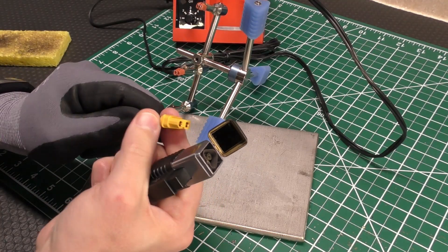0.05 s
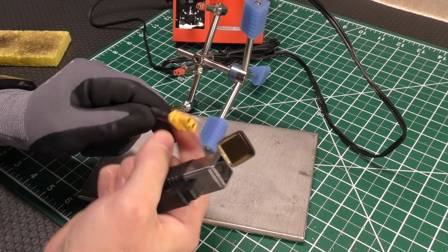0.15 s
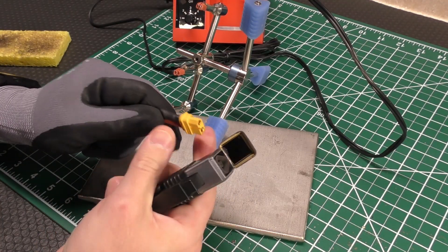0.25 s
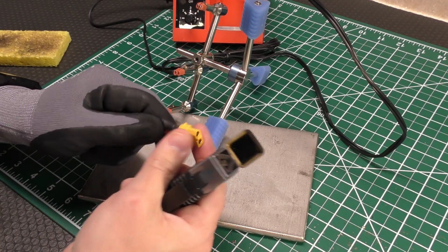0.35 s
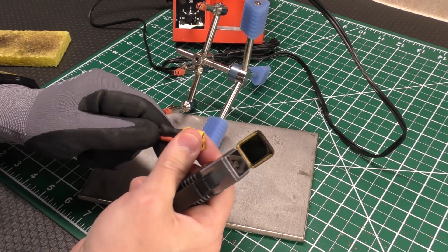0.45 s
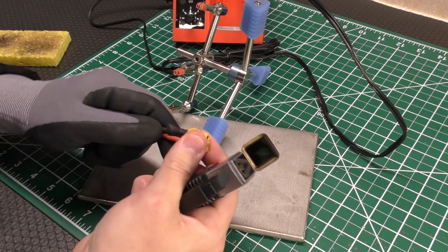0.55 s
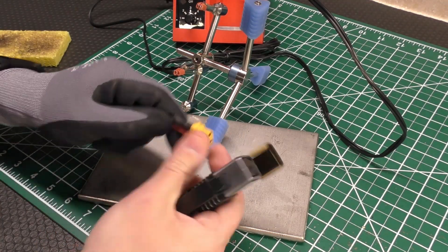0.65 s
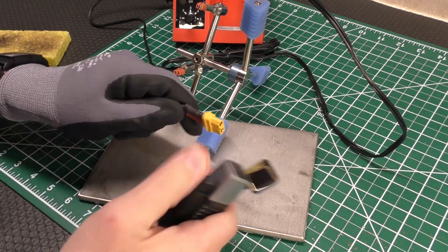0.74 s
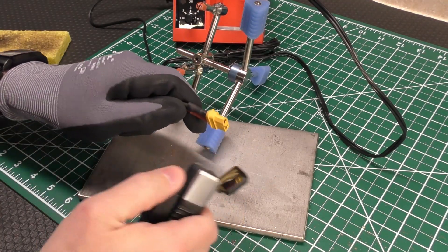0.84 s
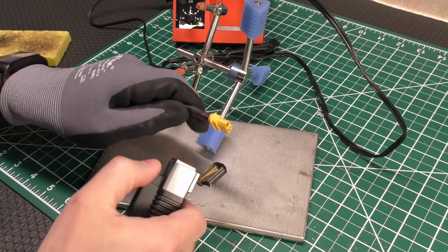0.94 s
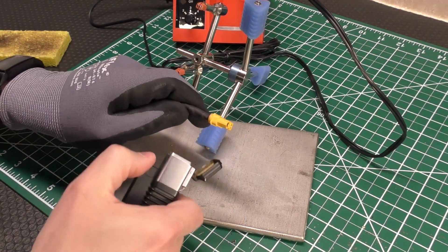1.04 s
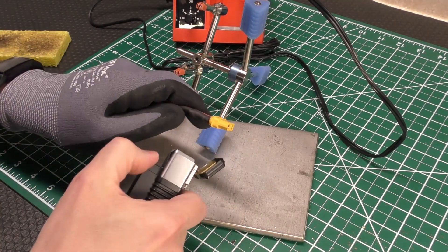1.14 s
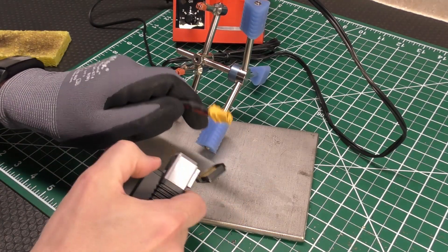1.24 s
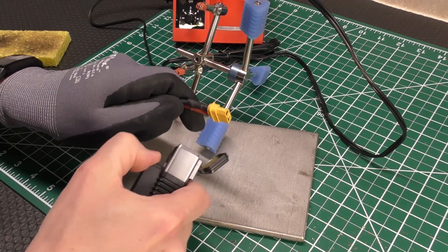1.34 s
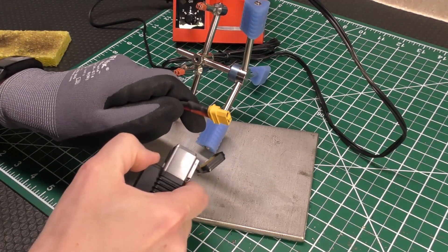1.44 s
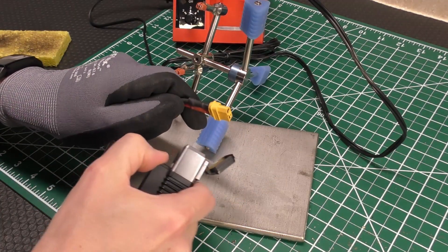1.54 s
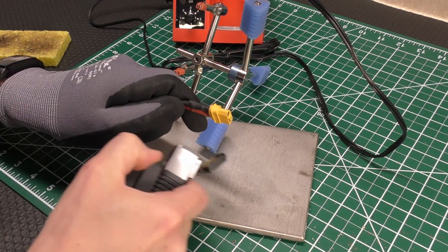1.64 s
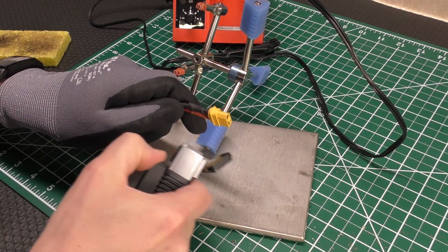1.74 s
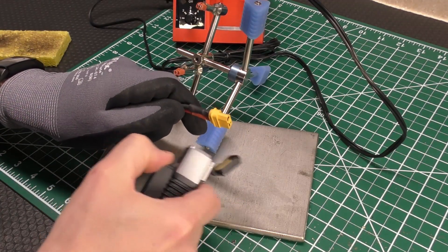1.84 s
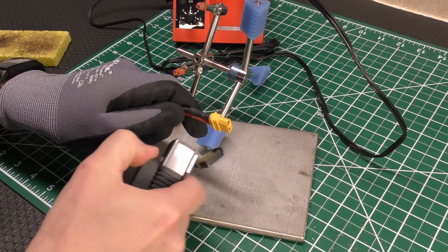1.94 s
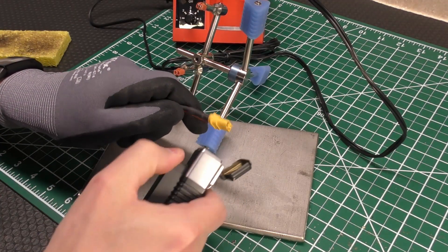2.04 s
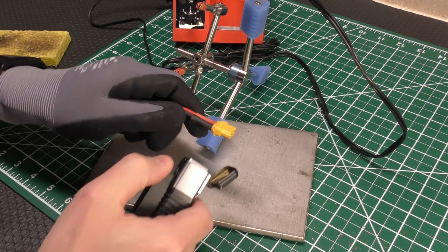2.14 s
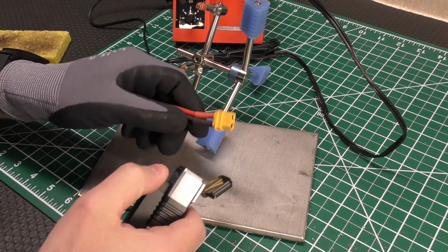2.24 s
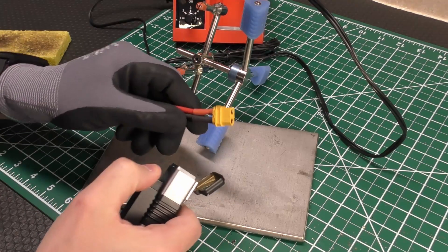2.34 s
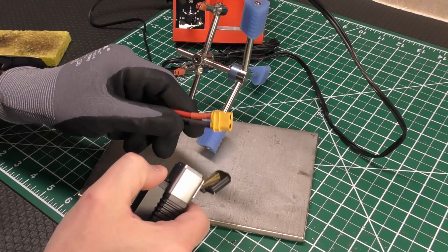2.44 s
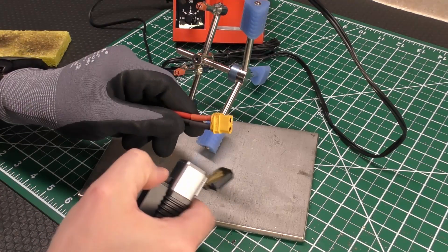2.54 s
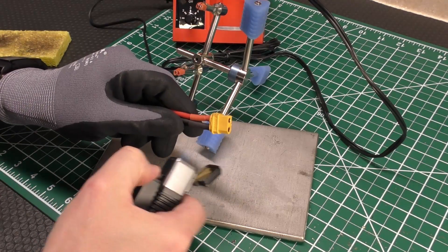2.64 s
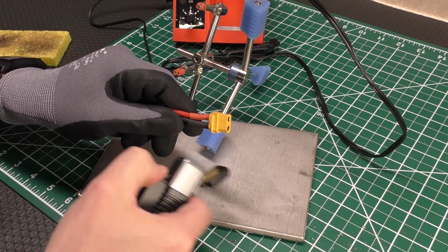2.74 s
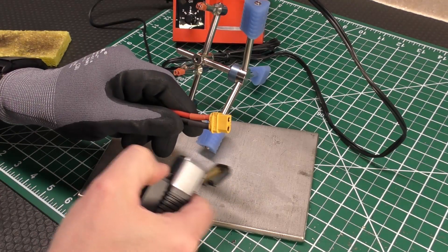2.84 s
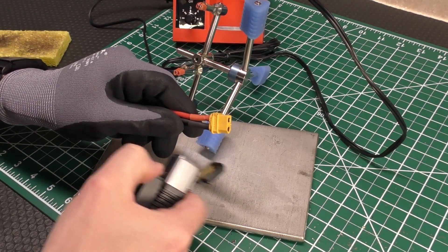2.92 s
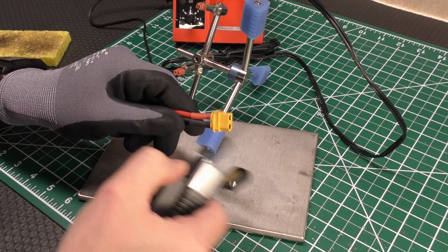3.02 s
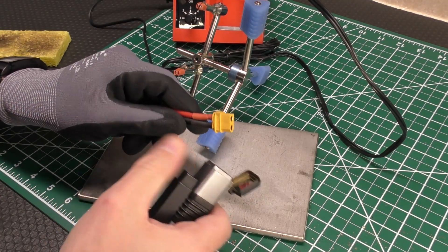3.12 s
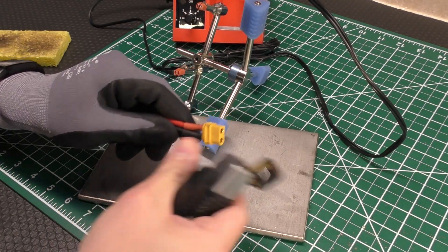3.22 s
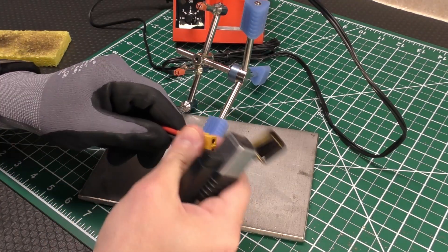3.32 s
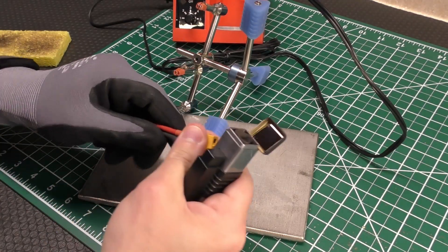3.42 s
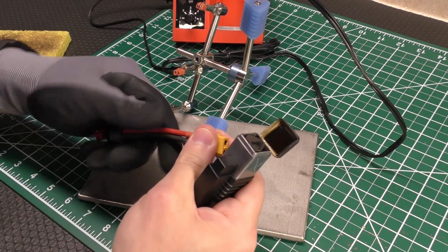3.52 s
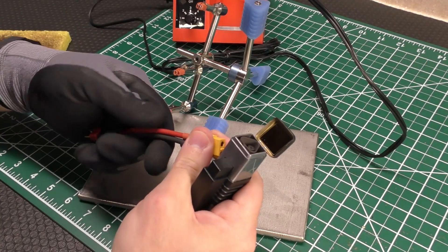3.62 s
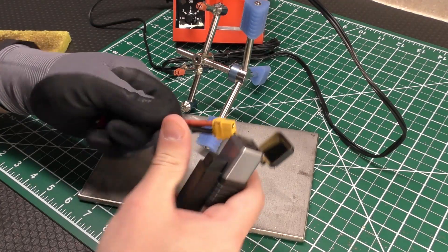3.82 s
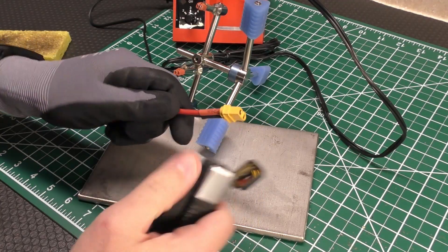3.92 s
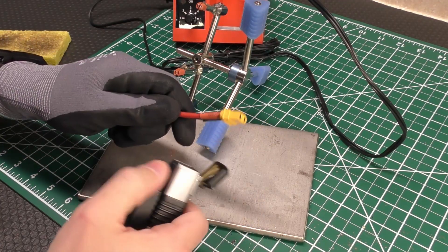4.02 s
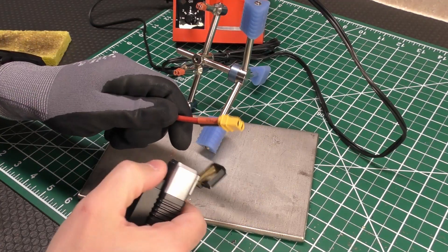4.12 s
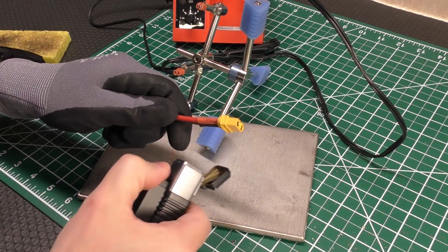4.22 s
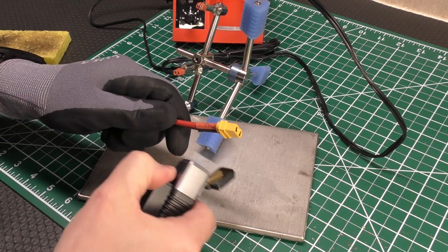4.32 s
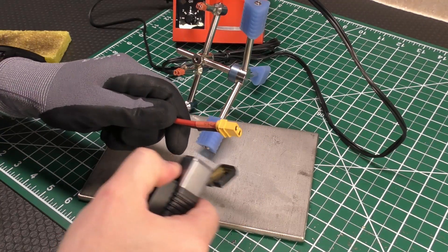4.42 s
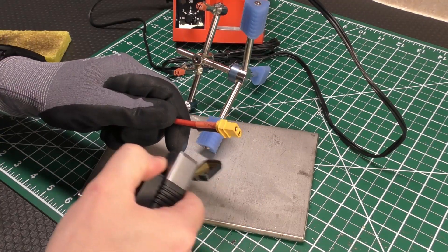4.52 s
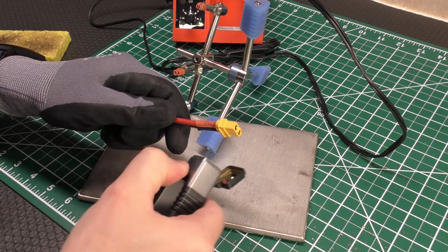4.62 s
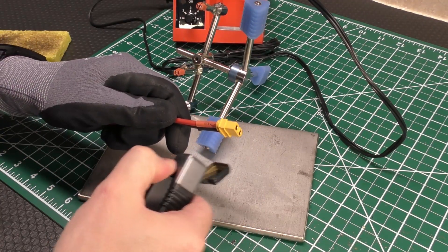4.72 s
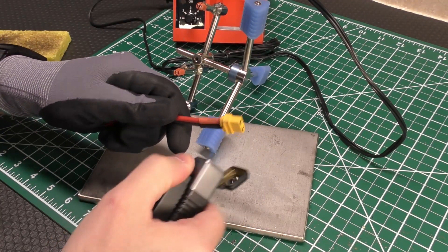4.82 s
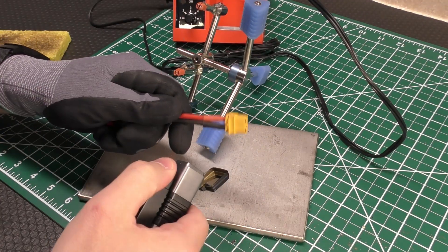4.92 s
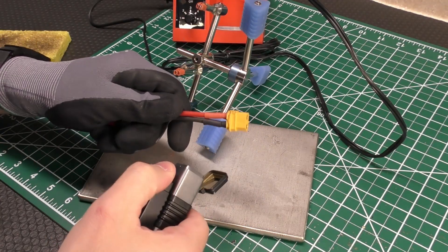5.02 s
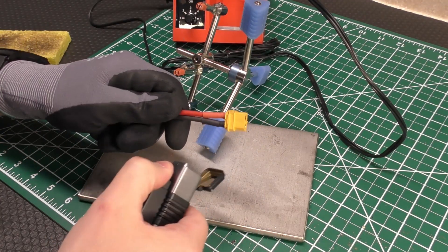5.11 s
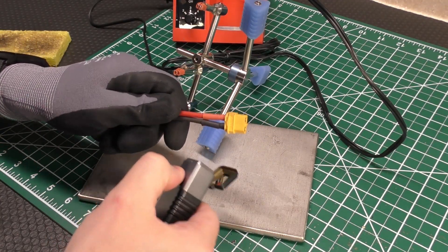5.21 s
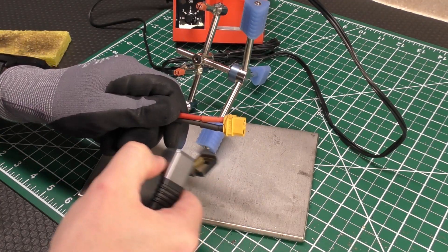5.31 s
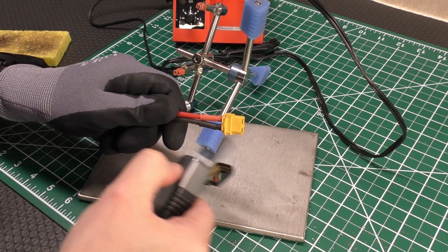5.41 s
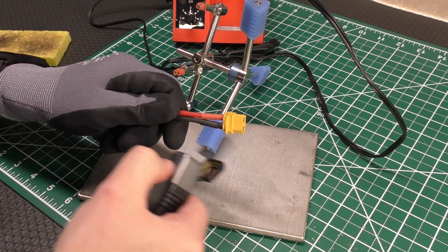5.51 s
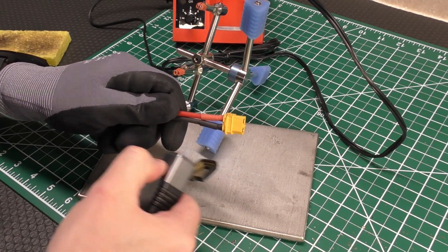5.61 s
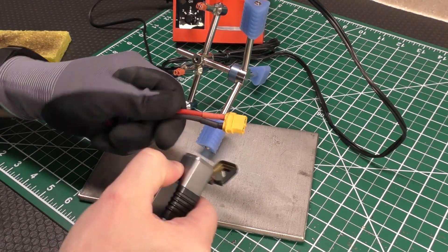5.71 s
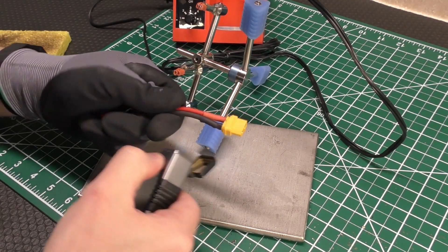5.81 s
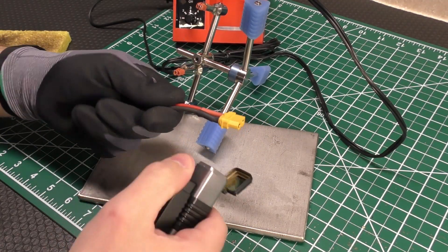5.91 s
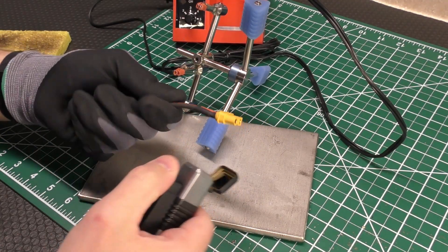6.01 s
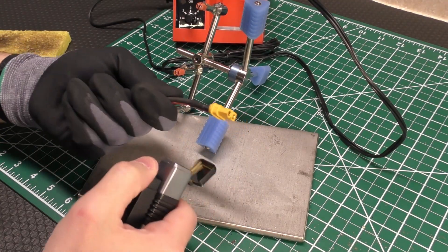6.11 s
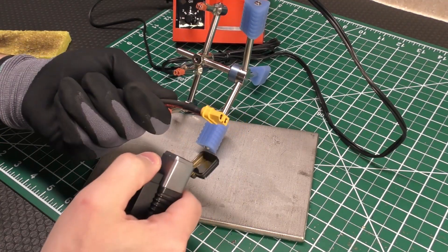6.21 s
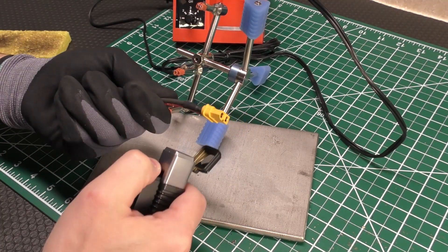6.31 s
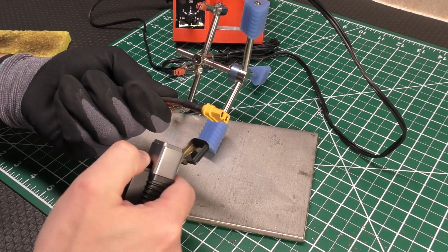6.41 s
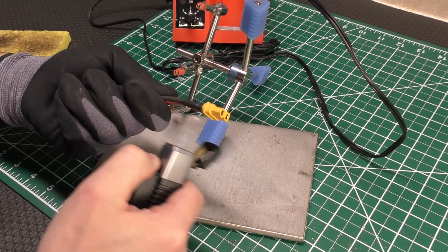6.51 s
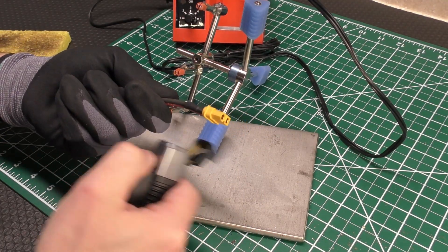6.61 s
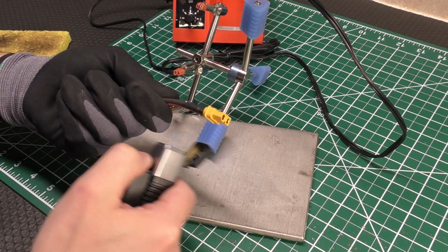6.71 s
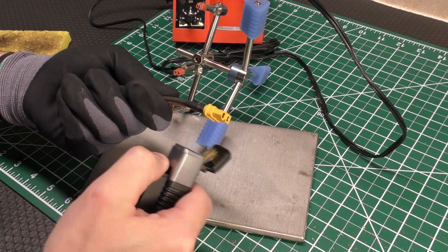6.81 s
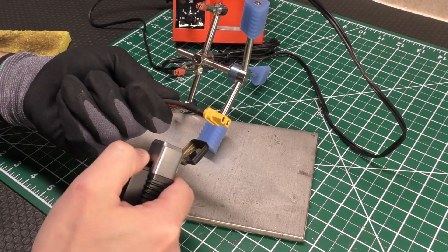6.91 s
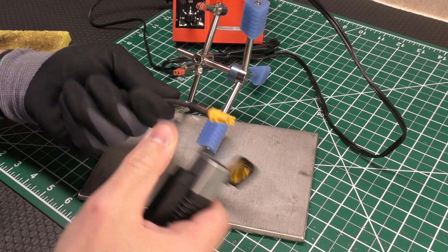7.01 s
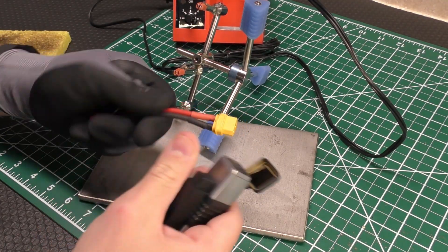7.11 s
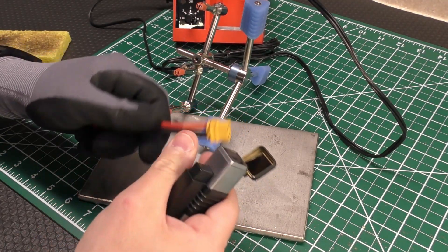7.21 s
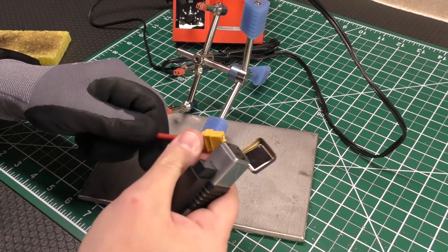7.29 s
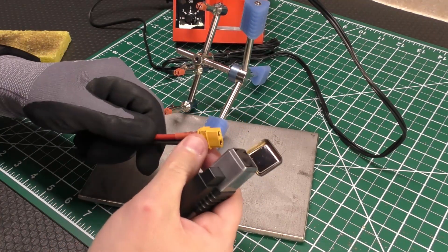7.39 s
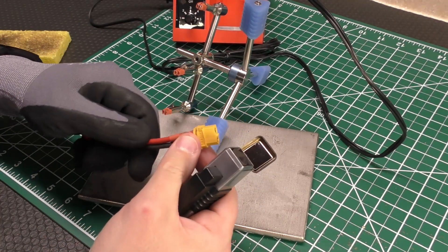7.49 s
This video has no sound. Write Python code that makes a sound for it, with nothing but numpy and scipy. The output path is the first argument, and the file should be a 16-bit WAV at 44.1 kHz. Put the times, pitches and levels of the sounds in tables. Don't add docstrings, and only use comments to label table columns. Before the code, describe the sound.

Five hard metallic trigger cracks, each with a brief hiss before and a pulsing torch roar after, ended by a light clack over faint room hum.

```python
import sys
import numpy as np
from scipy import signal
from scipy.fft import rfft, irfft, next_fast_len
from scipy.io import wavfile
from scipy.ndimage import uniform_filter1d

SR = 44100
rng = np.random.default_rng(int(sys.argv[2]) if len(sys.argv) > 2 else 0)


def master_out(mix):
    frames = np.transpose(np.atleast_2d(mix))
    ceiling = np.clip(frames, -1, 1)
    pcm = np.round(ceiling * 32767).astype(np.int16)
    wavfile.write(sys.argv[1], SR, pcm)


def elevation(decibels):
    levels = np.asarray(decibels, float)
    return 10 ** (levels / 20)


N = 332955
T = np.arange(N) / SR

# start in seconds, case face peak in dB, pins in dB, collar in dB, hollow note in Hz.
SNAPS = [
    (1.389, -10, 0, -10, 1880),
    (2.562, -11, 0.7, -2.5, 1880),
    (4.3208, -8.4, -3.6, -5.6, 1680),
    (5.2549, -10.6, 0.5, -2.6, 1660),
    (6.3625, -9.7, -1.3, -6.9, 1750),
]
# start in seconds, face peak in dB, pins in dB, collar in dB,
# hollow note in Hz.
CLACKS = [
    (2.114, -22.9, 3.2, 0.4, 1570),
    (3.1262, -28.6, 6.7, 5.9, 1610),
    (4.8931, -22.6, -3.5, 3.4, 1700),
    (5.9109, -23.8, 0, 1.5, 1750),
    (7.0306, -22.1, 3.9, -5.8, 1630),
]


def level(x, db):
    return x * elevation(db) / np.sqrt(np.mean(x ** 2))


def unit(x):
    return x / np.max(np.abs(x))


def curve(points, hz):
    p = np.array(points)
    return np.interp(np.log(hz + 1), np.log(p[:, 0]), p[:, 1])


def shaped(x, gain):
    n = next_fast_len(x.shape[-1], True)
    spectrum = rfft(x, n) * gain(np.fft.rfftfreq(n, 1 / SR))
    return level(irfft(spectrum, n)[..., :x.shape[-1]], 0)


def coloured(x, points):
    return shaped(x, lambda f: elevation(curve(points, f)))


def peak(f, hz, width):
    return 1 / np.sqrt(1 + ((f * f - hz * hz) / (width * f + 1)) ** 2)


def above(x, hz):
    return signal.sosfilt(signal.butter(4, hz, "high", fs=SR, output="sos"), x)


def turbulence(rough_db, grain_s):
    k = max(int(grain_s * SR), 1)
    noise = rng.standard_normal(N)
    flicker = uniform_filter1d(rng.standard_normal(N), k) * np.sqrt(k)
    return noise * elevation(rough_db * flicker)


def bump(s, length, steep=4.4, rise=0.91):
    out, near = np.zeros(N), np.abs(T - s) < 4 * length
    u = (T[near] - s) / (length / 2)
    u = np.where(u < 0, u / rise, u * rise)
    out[near] = np.exp(-.35 * np.abs(u) ** steep)
    return out


def ring(modes, scatter_db, t):
    out = 0
    for (hz, db, t60, *late), (strength, detune) in zip(modes, rng.standard_normal((len(modes), 2))):
        u = np.maximum(t - sum(late), 0)
        tone = np.sin(2 * np.pi * hz * (1 + .025 * detune) * u)
        out = out + elevation(db + scatter_db * strength) * tone * elevation(-60 * u / t60)
    return out


def pan(x, db):
    return x * elevation(np.array([[db], [-db]]) / 2)


def add(out, s, x, pan_db):
    i = int(s * SR)
    out[:, i:i + x.shape[-1]] += pan(x, pan_db)[:, :N - i]


def shop():
    # frequency in Hz, density in dB per Hz.
    vent = [(18, -37), (30, -14.5), (63, -1.5), (86, -34), (102, -3.5), (157, -6.5), (179, -14), (236, -6),
            (327, -10), (386, -6.5), (447, -8.5), (485, -12), (610, -24), (1190, -16.5), (1500, -17.5),
            (1950, -28.5), (3300, -120)]
    # frequency in Hz, side minus mid in dB.
    width = [(60, -6), (110, -9.5), (200, -3), (380, -11.5), (700, -13), (1290, -5), (2380, -4.5),
             (4400, -1.5), (8120, -9.5), (15000, 0.5)]
    # frequency in Hz, density in dB per Hz.
    air = [(880, -21), (1500, -3), (2320, -3), (3410, -9), (4420, -12), (6310, -22), (6690, -20),
           (12400, -13), (16000, -16.5)]
    # frequency in Hz, level in dB.
    hum = [(59.2, -66), (150.7, -71), (220.7, -63.5), (301.5, -64.5), (479.1, -68), (1168, -73)]
    # time in seconds, rise of the murmur in dB, length in seconds.
    shuffle = [
        (.95, 2, 0.3),
        (3.543, 1, 0.13),
    ]
    vent_db, air_db = -57.5, -63.5
    murmur_db = vent_db + sum(db * bump(s, length, steep=5.8) for s, db, length in shuffle)

    def field():
        murmur = elevation(murmur_db) * coloured(turbulence(0.39, 0.017), vent)
        return murmur + elevation(air_db) * coloured(turbulence(0.33, 0.022), air)

    mid, side = field(), field()
    side = irfft(rfft(side) * elevation(curve(width, np.fft.rfftfreq(N, 1 / SR))), N)
    lines = 0
    for hz, db in hum:
        lines = lines + elevation(db - 2.5) * shaped(rng.standard_normal(N), lambda f: peak(f, hz, 8.6) ** 2)
    return np.array([mid + side, mid - side]) + lines


def room(x):
    # centre in Hz, decay by 60 dB in seconds, level in dB.
    bands = [(148.5, 0.53, -25.5), (504, 0.48, -23.5), (1720, 0.22, -19.5), (3340, 0.62, -20.5),
             (6400, 0.41, -20), (8800, 0.38, -15.5), (12000, 0.26, -34)]
    t = T[:SR // 2]

    def decay():
        out = 0
        for hz, t60, db in bands:
            noise = shaped(rng.standard_normal(len(t)), lambda f: peak(f, hz, 1.73 * hz) ** 2)
            out = out + elevation(db - 34.5) * noise * elevation(-60 * t / t60)
        return out

    mid, side = decay(), decay()
    echo = np.array([mid + 0.4 * side, mid - 0.58 * side]) * (t > .004)
    return signal.fftconvolve(x.mean(axis=0)[None], echo, axes=1)[:, :N]


def rubbing():
    # time in seconds, level in dB, length in seconds, centre in Hz.
    scuffs = [
        (0.175, -53.5, 0.018, 7550),
        (0.227, -58.5, 0.034, 6900),
        (0.7, -68, 0.04, 7000),
        (0.865, -66, 0.024, 6000),
        (3.543, -57.5, 0.046, 1940),
        (3.55, -74, 0.019, 7000),
        (3.846, -69.5, 0.03, 6100),
        (6.195, -61, .008, 2300),
        (7.38, -68.5, 0.043, 6000),
    ]
    out, grit = np.zeros(N), turbulence(2.5, .002)
    for s, db, length, hz in scuffs:
        shape = bump(s, length, steep=3.0)
        on = shape > 0
        out[on] += elevation(db) * shape[on] * shaped(grit[on], lambda f: peak(f, hz, hz) ** 2)
    return out


def hinge():
    # time in seconds, pitch in Hz, level in dB.
    swing = [
        (.58, 11800, -90),
        (.62, 12100, -77),
        (.66, 12800, -84),
        (.70, 13450, -75),
        (.77, 13100, -76),
        (.85, 12100, -74),
        (.9, 11300, -92),
        (.96, 12200, -75),
        (1.0, 12100, -90),
    ]
    # frequency ratio, level in dB.
    partials = [(1, 3), (.84, -4), (.335, -4)]
    s, hz, db = np.transpose(swing)

    def slow(rate_hz):
        return shaped(rng.standard_normal(N), lambda f: 1 / (1 + (f / rate_hz) ** 4))

    wobble = 1 + .008 * slow(120) + .006 * slow(20)
    phase = 2 * np.pi * np.cumsum(np.interp(T, s, hz) * wobble) / SR
    tone = sum(elevation(part_db + 2.5 * slow(25)) * np.sin(ratio * phase) for ratio, part_db in partials)
    return np.sqrt(2) * elevation(np.interp(T, s, db, left=-120, right=-120)) * tone


def hollow(hz, t, squeeze_s):
    phase = 2 * np.pi * np.cumsum(hz * (.93 + .6 * np.exp(-t / .0006))) / SR
    squeezed = np.exp(-(t / squeeze_s - 1.2) ** 2)
    return np.sin(phase) * (squeezed + .13 * np.exp(-t / .004))


def blows(table, squeeze_s, hollow_db, spark_db, shine_db, pan_db, ring_db, rattle_db, rattle_s, rattle_hz,
          rebound_db, pop_db):
    # frequency in Hz, level in dB, decay by 60 dB in seconds,
    # delay after the blow in seconds.
    face = [(3150, 1, .009, 0), (2550, 1, .009, .0002), (3700, -9, .006, 0)]
    collar_modes = [(4700, -3, .006, 0), (5200, -1, .006, .0003), (5800, -3, .005, .0005),
                    (6400, 0, .007, .0001), (7200, -2, .005, .0004)]
    pin_modes = [(8000, -6, .005, .0005), (8700, -2, .006, .0003), (9500, -6, .004, .0006),
                 (10400, -3, .005, 0), (11200, 0, .006, .0001), (12000, -2, .005, .0004),
                 (13500, -6, .004, 0), (15000, -9, .004, .0003)]
    # frequency in Hz, level in dB,
    # decay by 60 dB in seconds.
    lid = [(1600, -52, 0.58), (2080, -35, 0.12), (4230, -28.5, 0.074), (4860, -33, 0.079), (6040, 7, 0.034),
           (7795, -46, 0.12), (9780, -14.5, 0.067), (10640, -24, 0.11), (11070, -23, 0.036),
           (11740, -28, 0.27), (12300, -19, 0.027), (13260, -16.5, 0.067)]
    bench = [(138.6, -0.5, 0.067), (214.7, 10, 0.024), (282, -11.5, 0.05)]
    out, t = np.zeros((2, N)), T[:SR // 4]

    def loose(f):
        return elevation(2) * peak(f, 2030, 1100) + peak(f, rattle_hz, 0.39 * rattle_hz) + elevation(shine_db) * peak(f, 12000, 8000)

    for s, db, pins_db, collar_db, hz in table:
        pins = elevation(pins_db + 2) * unit(ring(pin_modes, 1.5, t))
        crack = elevation(1.2) * unit(ring(face, 1.5, t)) + pins
        crack = crack + elevation(hollow_db - 1) * hollow(hz, t, squeeze_s)
        crack = crack + elevation(collar_db + 2.5) * unit(ring(collar_modes, 2.5, t))
        spark = above(rng.standard_normal(len(t)), 9000) * np.exp(-t / .0009)
        crack = crack + elevation(pins_db + spark_db) * spark

        rattle = shaped(rng.standard_normal(len(t)), loose)
        rebound = elevation(rebound_db) * np.exp(-((t - .008) / .004) ** 2)
        rattle = rattle * (elevation(rattle_db - 60 * t / rattle_s) + rebound)
        tail = elevation(max(collar_db, pins_db)) * rattle + elevation(ring_db) * ring(lid, 4.0, t)
        body = above(crack + tail * (1 - np.exp(-(t / .002) ** 2)), 1050)

        puff = ring(bench, 0.63, t) * (1 - np.exp(-t / 0.0028))
        pop = elevation(pop_db) * np.roll(puff, int(0.0028 * SR))
        add(out, s - .0006, elevation(db - 17) * above(crack, 1250), pan_db)
        add(out, s - .0001, elevation(db) * (body + above(pop, 95)), pan_db)
        add(out, s, elevation(db - 4) * above(pins, 12000) * np.array([[1], [-1]]), 0)
    return out


def ticks():
    # start in seconds, face peak in dB, pins in dB, collar in dB, hollow note in Hz.
    taps = [(0.8585, -46.4, -4.5, 3.4, 2190), (1.1483, -53.7, -9.7, -16.6, 1910),
            (1.2656, -53, 17.4, 3.7, 2350), (2.0146, -43.5, -9.6, -6.7, 2390),
            (2.0756, -43.7, 2.7, 2.4, 1710), (4.0011, -44.9, -5.4, -1.3, 1560),
            (4.0764, -48.6, -13.1, -10.0, 2390), (4.281, -57.4, -7.7, -9.1, 2390),
            (4.8609, -41.5, 0.3, 1.6, 1670), (5.1144, -49.6, -8.9, -14.3, 1910),
            (5.8742, -40.6, -1.1, -6.1, 1920), (5.8961, -40.4, 2.4, -4.6, 2070),
            (6.264, -48, -12.7, -16.3, 1890)]
    return blows(taps, squeeze_s=.0006, hollow_db=7, spark_db=-9, shine_db=-3, pan_db=2.5, ring_db=-40.5,
                 rattle_db=-12, rattle_s=0.14, rattle_hz=6010, rebound_db=-30.5, pop_db=-49.5)


def clacks():
    return blows(CLACKS, squeeze_s=.0006, hollow_db=2.5, spark_db=-13, shine_db=-2, pan_db=2.7, ring_db=-37.0,
                 rattle_db=-10.5, rattle_s=0.09, rattle_hz=5630, rebound_db=-35, pop_db=-17.0)


def snaps():
    return blows(SNAPS, squeeze_s=.00105, hollow_db=0.5, spark_db=-4, shine_db=-1.5, pan_db=2.5, ring_db=-31,
                 rattle_db=-25.0, rattle_s=0.084, rattle_hz=6890, rebound_db=-16.5, pop_db=-16.5)


def gas():
    # valve opens in seconds, shuts in seconds, hiss before the flame in dB, hiss under it in dB.
    valve = [
        (1.218, 2.114, -61, -79),
        (2.497, 3.126, -61, -78),
        (4.283, 4.896, -61, -69),
        (5.214, 5.91, -61, -72),
        (6.32, 7.03, -63, -64),
    ]
    # frequency in Hz, width in Hz, level in dB.
    nozzle = [(7200, 800, -1), (10200, 1100, 0), (13500, 500, -10), (11000, 7000, -11)]
    flare_db, flare_t60_s, flare_hz = -44.5, 0.58, 6300
    top_db = -68.5
    hiss = shaped(turbulence(1.5, 0.0041),
                  lambda f: sum(elevation(db) * peak(f, hz, width) ** 2 for hz, width, db in nozzle))
    flow, flare, burning = np.zeros(N), np.zeros(N), np.zeros(N)
    for (opens, shuts, cold_db, hot_db), on, off in zip(valve, SNAPS, CLACKS):
        lit_s = on[0]
        flow += np.where(T < lit_s, elevation(cold_db), elevation(hot_db)) * (T > opens) * (T < shuts)
        flare += (T > lit_s + .005) * elevation(flare_db - 60 * np.maximum(T - lit_s, 0) / flare_t60_s)
        burning += (T > lit_s) & (T < off[0])
    bright = flare * shaped(turbulence(1.0, .004),
                            lambda f: peak(f, flare_hz, 2200) ** 2 + elevation(-13) * peak(f, 10000, 6000))
    top = elevation(top_db) * burning * shaped(rng.standard_normal(N), lambda f: peak(f, 13000, 7000) ** 2)
    return hiss * uniform_filter1d(flow, int(0.023 * SR)) + bright + top


def flame():
    # roar in dB, rumble in dB, time to reach full flame in seconds.
    firings = [
        (-46, -55.5, 0.074),
        (-44, -51.5, 0.21),
        (-45.5, -54, 0.092),
        (-46, -53, 0.085),
        (-44, -54, 0.087),
    ]
    # time in seconds, level in dB, length in seconds.
    crossings = [(1.714, -41.4, 0.037), (1.795, -48, 0.026), (1.886, -41, 0.046), (1.945, -41.5, 0.031),
                 (2.037, -43, .02), (2.043, -42.5, 0.047), (2.642, -41.5, 0.047), (2.723, -40.5, 0.05),
                 (2.81, -42.5, 0.037), (2.899, -37.5, 0.027), (2.983, -44, 0.046), (3.074, -39.5, 0.052),
                 (4.559, -44, 0.058), (4.633, -37, 0.018), (4.661, -37.5, 0.022), (4.717, -40, 0.027),
                 (4.809, -40, 0.032), (5.402, -39, 0.033), (5.48, -38.5, 0.028), (5.577, -38, 0.032),
                 (5.65, -45, 0.024), (5.737, -38, 0.046), (5.81, -39, 0.031), (5.901, -42, .03),
                 (6.573, -42.5, 0.04), (6.668, -38, 0.042), (6.764, -39, 0.027), (6.836, -38, 0.04),
                 (6.921, -42.5, 0.043), (7.002, -35.5, 0.029)]
    # frequency in Hz, density in dB per Hz.
    roar_colour = [(350, -57), (600, -13), (727, -16.5), (988, 0), (1170, -7.5), (1640, 2.5), (1930, -2.5),
                   (2260, -1.5), (2740, -9.5), (3300, -12.5), (5170, -25.5), (7510, -38), (9000, -48),
                   (11700, -60), (19800, -120)]
    rumble_colour = [(90, -15.5), (150, -6.5), (230, -0.5), (310, 1.5), (470, 0), (600, -6.5), (800, -26)]
    splash_colour = [(410, -31), (700, -16.5), (978, -6.5), (1200, -12), (1320, -5.5), (1660, -0.5),
                     (1840, -6.5), (2270, -2), (2890, -16), (3940, -21.5), (6330, -32.5), (7100, -26),
                     (8340, -35), (11000, -28), (14300, -60), (22000, -120)]
    catch_db = -17
    lick_treble_db, lick_rumble_db, lick_duck_db = -11.5, -9, -3.5
    puff_db, treble_growth = 1, 0.02

    lit, roar_db, rumble_db = np.zeros(N), np.zeros(N), np.zeros(N)
    for on, off, (full_roar_db, full_rumble_db, build_s) in zip(SNAPS, CLACKS, firings):
        burning = (T > on[0]) & (T < off[0] + .004)
        building_db = catch_db * np.clip(1 - (T - on[0]) / build_s, 0, 1)
        lit += burning
        roar_db += burning * (building_db + full_roar_db)
        rumble_db += burning * (building_db + full_rumble_db)
    lit = uniform_filter1d(lit, int(0.004 * SR))

    def splash_top(f):
        return elevation(curve(splash_colour, f)) / (1 + (2800 / (f + 1)) ** 8)

    roar = coloured(turbulence(1.7, 0.0065), roar_colour)
    rumble = coloured(turbulence(2.9, 0.0092), rumble_colour)
    low = shaped(turbulence(2.9, 0.0024), lambda f: elevation(curve(splash_colour, f)) / (1 + (f / 3000) ** 8))
    high = shaped(turbulence(2.2, .002), lambda f: splash_top(f) / (1 + (f / 10000) ** 4))
    puffs = shaped(turbulence(4.0, .006), lambda f: splash_top(f) * peak(f, 4400, 2200))
    high = high + elevation(puff_db) * puffs

    low_power, high_power, cover = np.zeros(N), np.zeros(N), np.zeros(N)
    for s, db, length in crossings:
        shape = bump(s, length, rise=0.72)
        low_power += (elevation(db - 1.5) * shape) ** 2
        high_power += (elevation(db + treble_growth * (db + 40)) * shape ** 1.8) ** 2
        cover += shape
    low_gain = np.sqrt(low_power)
    high_gain = elevation(lick_treble_db) * np.sqrt(high_power)
    duck_db = lick_duck_db * np.minimum(cover, 1)

    def steady(db):
        return uniform_filter1d(elevation(db) * (db < 0), int(.012 * SR))

    rumble_gain = np.hypot(steady(rumble_db), lit * elevation(lick_rumble_db) * low_gain)
    jet = steady(roar_db) * elevation(duck_db) * roar + rumble_gain * rumble
    return pan(jet + lit * (low * low_gain + high * high_gain), 1)


def scene():
    hits = snaps() + clacks() + ticks()
    jet = flame() + gas() + rubbing() + hinge()
    return hits + jet + room(hits + elevation(5.5) * jet) + shop()


def top_cut(x):
    return signal.sosfilt(signal.butter(12, 17060, fs=SR, output="sos"), x)


def record(dry):
    rounded = np.tanh(.9 * dry) / .9
    low_pass = signal.ellip(8, .2, 60, 15650, fs=SR, output="sos")
    return top_cut(signal.sosfilt(low_pass, rounded))


dry = scene()
out = record(dry)
master_out(out)
```